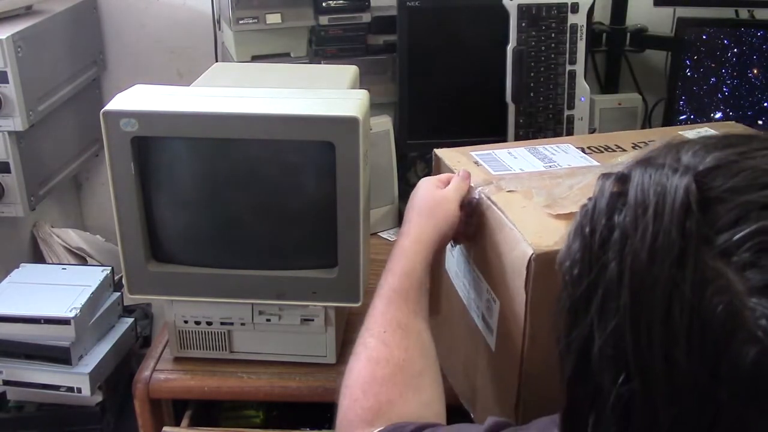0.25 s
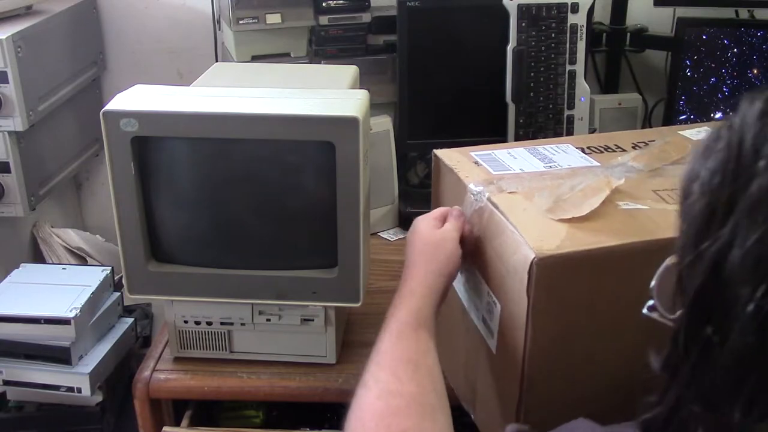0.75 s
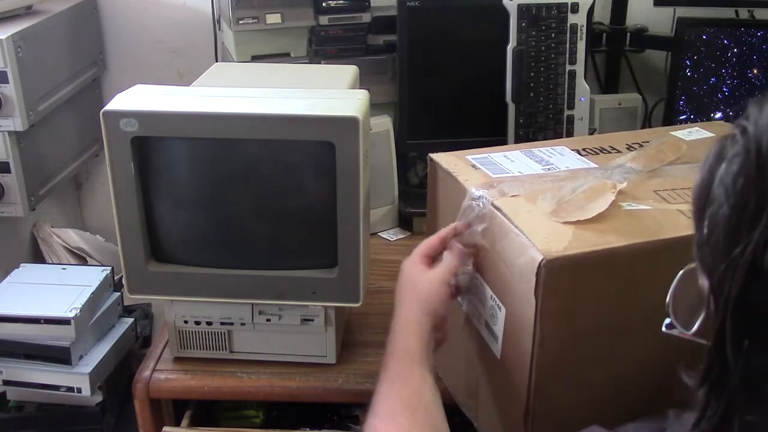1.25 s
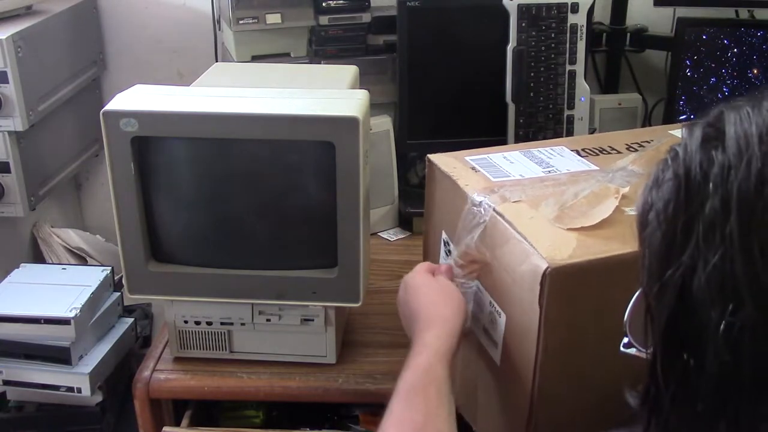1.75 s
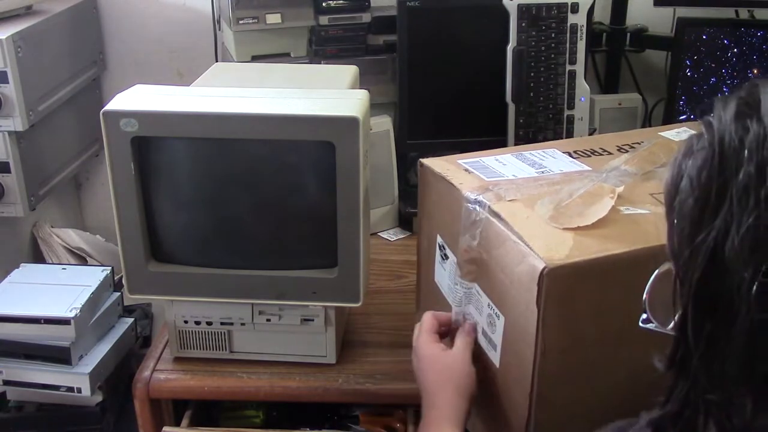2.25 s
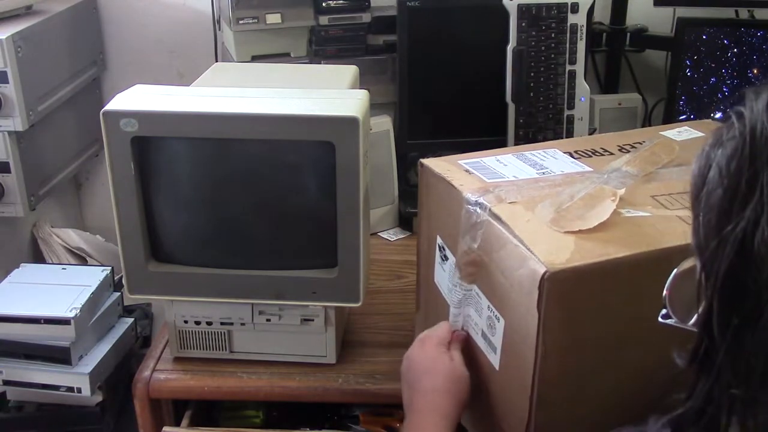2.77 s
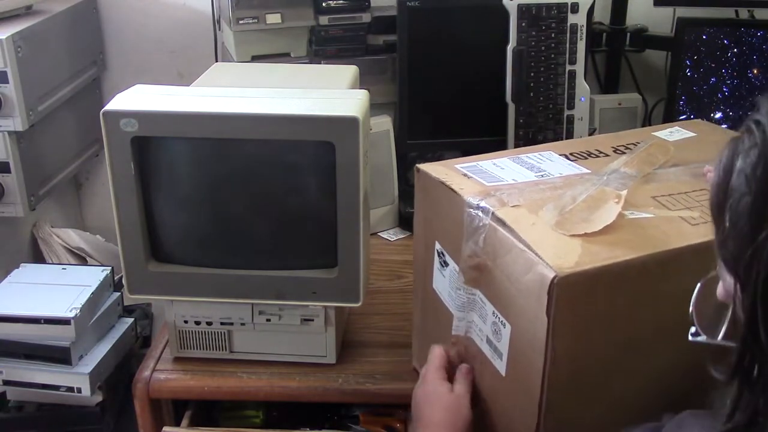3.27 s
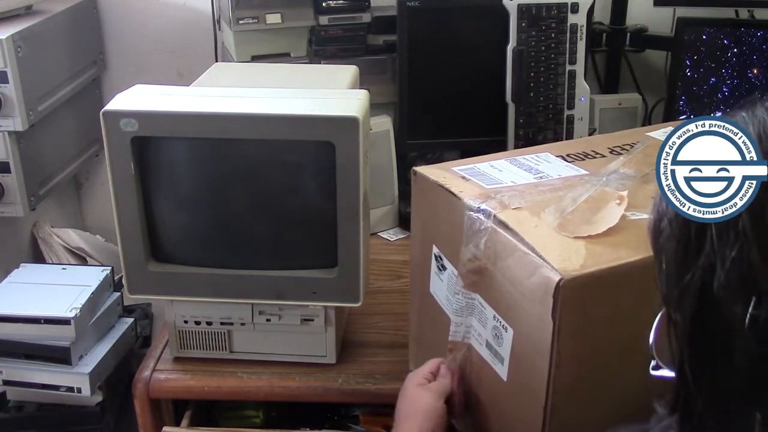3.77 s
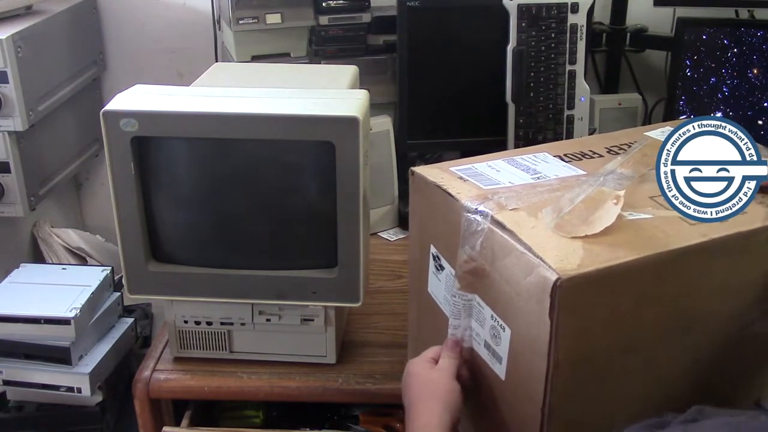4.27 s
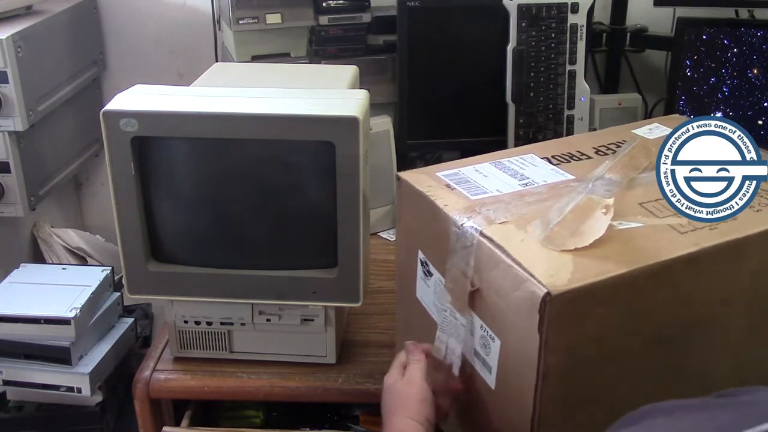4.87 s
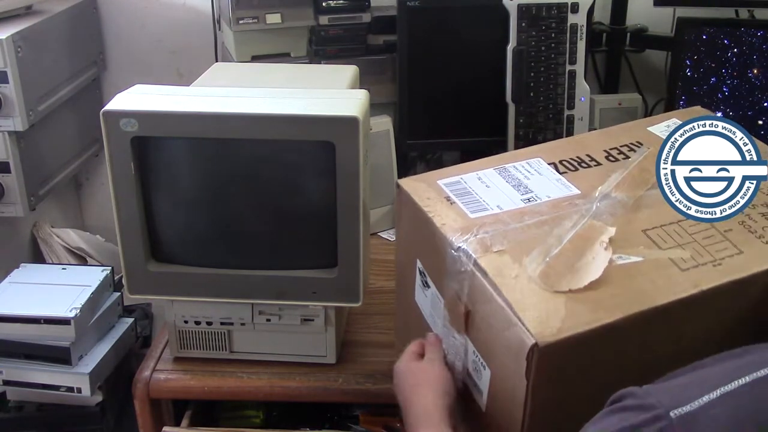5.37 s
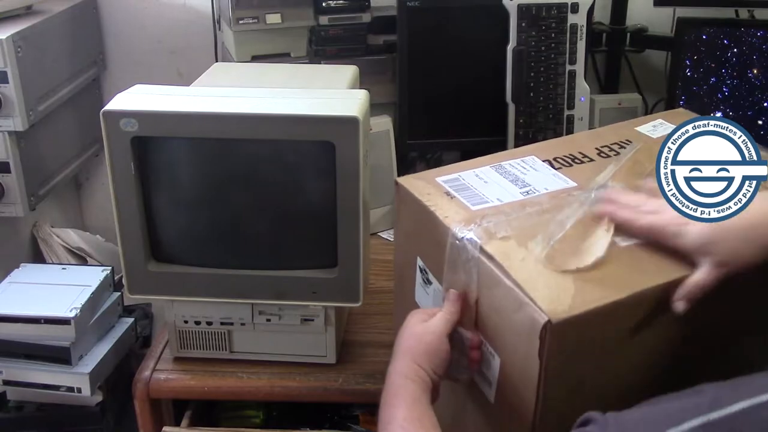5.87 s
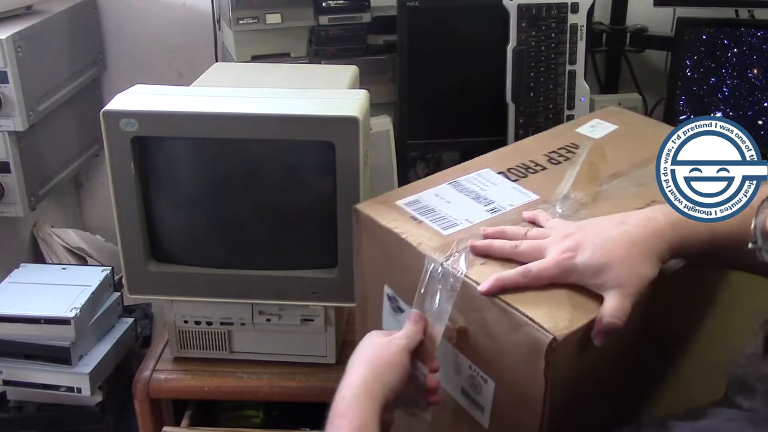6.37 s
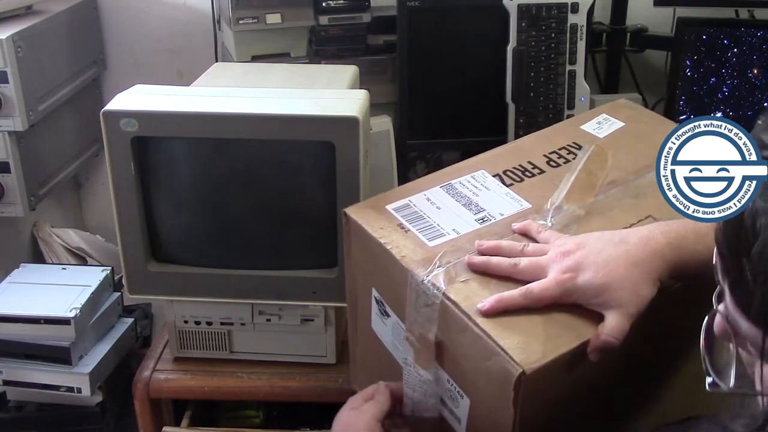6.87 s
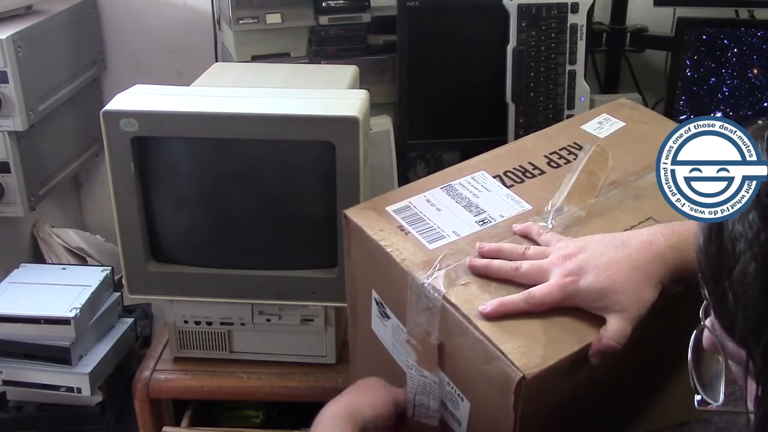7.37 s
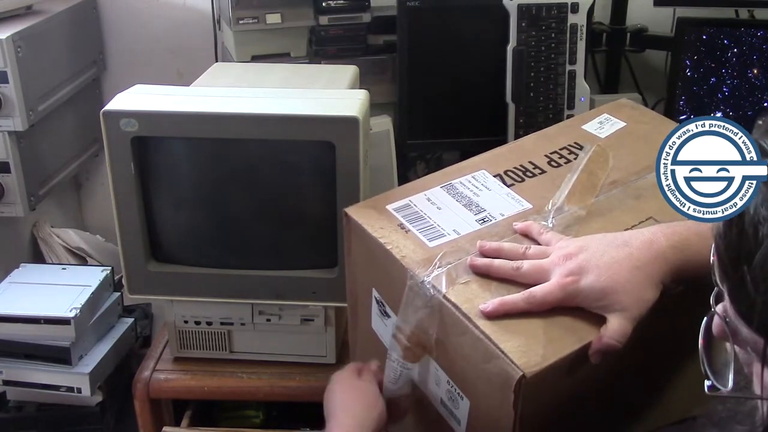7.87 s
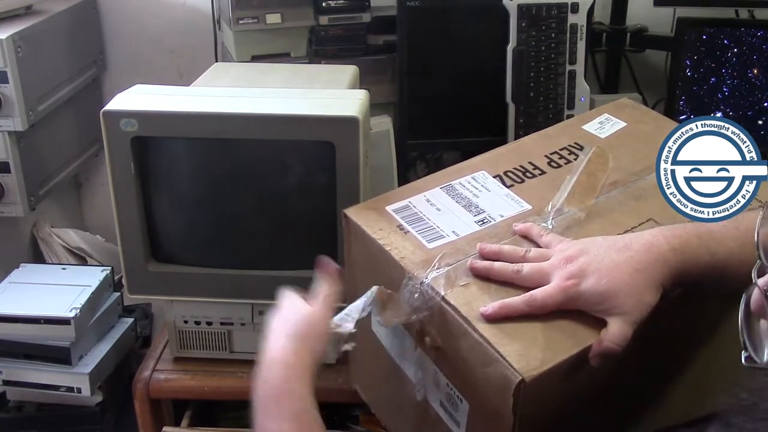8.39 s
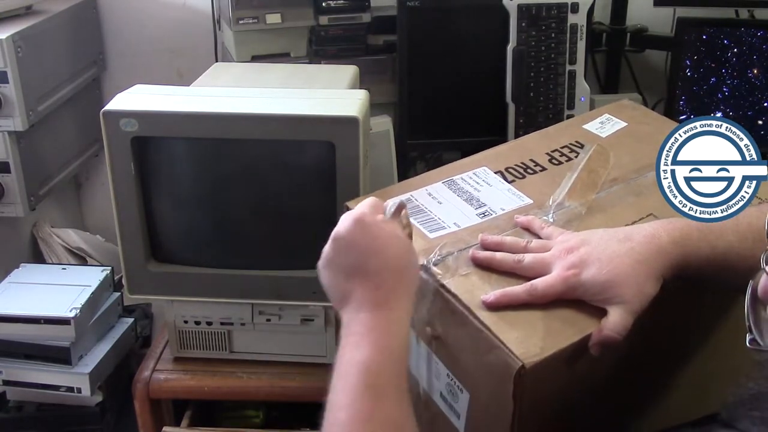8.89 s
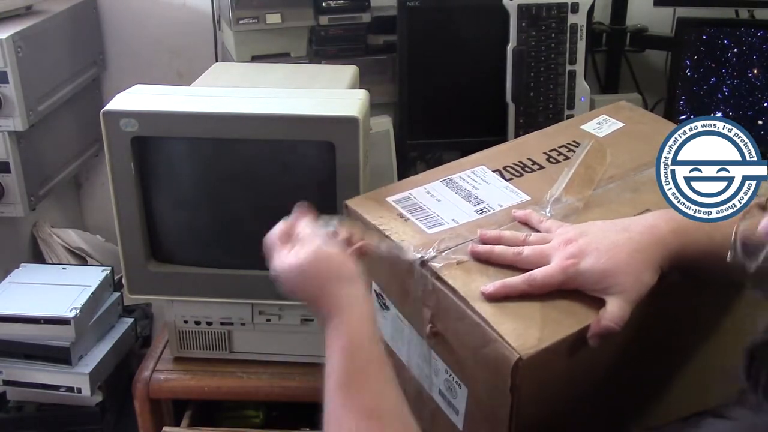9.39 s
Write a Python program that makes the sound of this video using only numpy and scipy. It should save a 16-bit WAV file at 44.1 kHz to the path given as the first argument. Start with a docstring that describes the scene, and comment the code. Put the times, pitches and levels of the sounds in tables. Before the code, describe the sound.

A small, cluttered room, with the microphone about a metre from a cardboard box and a very faint fan hissing and humming with a slight beat. From 0 to 1 second packing tape tears in loud, dense, irregular crackles and hard snaps, the box giving a papery, hollow body and the film a bright edge, with brief squeaks. It drops to light crinkling, then snaps again at about 1.7 to 2.0, 2.85, 3.5 to 3.9 and 4.1 to 4.5 seconds. From 4.6 to 7.7 only faint ticks and rustles remain, with a soft hollow knuckle knock near 5.6 and a small snap near 6.2. Another soft knock at 7.8 leads into renewed peeling until 8.2; sharp, bright rips follow at 8.7 to 8.9, then smaller snaps at 9.2 and 9.4 fade into light crinkles. Room reflections are short.

```python
"""Packing tape is picked at and torn off a cardboard box in a small cluttered room, about a metre from a camera.
A fan hisses and hums throughout: shaped noise, two close beating tones and a fainter high one, swelling together.
From the start the film crackles in spells of stick-slip noise, and glue snaps (noise bursts) ring box, panel and film.
Creased film squeaks on narrow resonances from 0.2 s; snaps crowd the first second and thin out after 4.5 s.
A knuckle knocks the hollow side at 5.6 and 7.8 s, and snaps gather again from 7.8 s; loud peaks are rounded off."""
import sys
import numpy as np
from scipy import signal
from scipy.fft import rfft, irfft
from scipy.io import wavfile
from scipy.ndimage import uniform_filter1d

SR = 44100
rng = np.random.default_rng(int(sys.argv[2]) if len(sys.argv) > 2 else 0)


def digitize_waveform(pressure):
    """Quantize a signal to 16-bit integers and store it at the path in sys.argv[1].

    Rows of a 2-D input are taken as channels; values are limited to [-1, 1].
    """
    field = np.atleast_2d(pressure).T
    bounded = np.clip(field, -1, 1)
    quanta = np.round(bounded * 32767).astype(np.int16)
    wavfile.write(sys.argv[1], SR, quanta)


def amplitude_ratio(level_db):
    """Convert a level in decibels to the matching linear amplitude (field) ratio."""
    exponent = np.asarray(level_db, float) / 20
    return 10 ** exponent


N = 425124
T = np.arange(N) / SR


def unit(x):
    """Scale to rms 1."""
    return x / np.sqrt(np.mean(x ** 2))


def colour(x, points):
    """Shape a noise spectrum by (frequency [Hz], level [dB]) points, joined on a log-frequency axis."""
    hz, db = np.transpose(points)
    f_hz = np.arange(N // 2 + 1) * SR / N + 1
    gain_db = np.interp(np.log(f_hz), np.log(hz), db)
    return irfft(rfft(x) * amplitude_ratio(gain_db), N)


# Background swell: (time [s], level [dB])
FAN_SWELL = [(0, -93), (1.1, -80), (2.2, -79.5), (3.3, -82), (4.0, -83.5), (4.7, -93.5), (5.801, -87.5),
             (6.5, -85.5), (6.9, -83.5), (7.501, -84.5), (8.3, -78.5), (8.7, -76), (9.1, -81),
             (9.64, -78.5)]
# Air hiss spectrum: (frequency [Hz], relative density [dB per Hz])
FAN_HISS = [(35, -68), (60, -37), (124, -24), (256, -12.5), (354, -2.5), (437, -12), (579, -5), (732, -9.5),
            (1040, -7), (2520, -13), (5330, -19), (8320, -16.5), (16000, -48)]
# Hum tones: (frequency [Hz], amplitude relative to swell [dB])
FAN_HUM = [(349.5, -4), (360.7, 7.5), (1039, -11)]


def fan():
    """Air hiss plus hum, two close tones beating and one higher, all under one swell."""
    hiss_db = 12.5
    s, db = np.transpose(FAN_SWELL)
    hum = sum(amplitude_ratio(tone_db) * np.sin(2 * np.pi * (hz * T + rng.random())) for hz, tone_db in FAN_HUM)
    hiss = amplitude_ratio(hiss_db) * unit(colour(rng.standard_normal(N), FAN_HISS))
    return amplitude_ratio(np.interp(T, s, db)) * (hum + hiss)


def walk(rate_hz):
    """Random levels held 1 / rate_hz and slewed; spread near 1."""
    hold = int(SR / rate_hz)
    levels = np.repeat(rng.standard_normal(N // hold + 1), hold)
    return 1.2 * uniform_filter1d(levels, hold)[:N]


def ring(x, modes, low_hz, wander_db, favour_db=None):
    """Two-pole resonances, dark below low_hz; the shape keeps changing, so each is driven more, then less."""
    out, click = 0, 0
    for k, (hz, width_hz, db) in enumerate(modes):
        mode = signal.iirpeak(hz, hz / width_hz, SR)
        sign = (-1) ** k
        drive_db = db + wander_db * walk(25.)
        if favour_db:
            drive_db = drive_db + favour_db(hz)
        out = out + sign * signal.lfilter(*mode, x * amplitude_ratio(drive_db))
        click = click + sign * amplitude_ratio(db) * signal.lfilter(*mode, np.eye(1, 2048)[0])
    steep = signal.butter(5, low_hz, "highpass", fs=SR, output="sos")
    return signal.sosfilt(steep, out) / np.sqrt(np.sum(click ** 2))  # unit click energy before the highpass


# Loose strip, higher when short and tight, shaking the box less when lifted clear:
# (time [s], favoured pitch [Hz], box drive relative to panel [dB])
LOOSE_STRIP = [(0, 1441, -2), (.35, 1461, -9), (.5, 1780, -4), (1.0, 2178, -1), (1.2, 3800, -3),
               (1.6, 3586, -6), (1.75, 2000, -0.5), (2.1, 2127, 0.5), (2.4, 3796, 1.5), (2.85, 2590, 3),
               (3.4, 3640, -4.5), (3.55, 2338, -3), (4.0, 2435, -4), (4.12, 2740, -25), (4.35, 2440, -13),
               (4.42, 2000, -0.5), (4.6, 2400, -3.5), (5.7, 2780, -7.5), (6.4, 2340, -4), (6.7, 3720, -1.5),
               (7.8, 2790, -2.5), (7.95, 2500, -22), (8.15, 2304, -3), (8.65, 2403, -18), (8.8, 2336, -8.5),
               (9.4, 2190, -14), (9.5, 4040, -13)]


def thump_db(s, panel_db, film_db):
    """How hard the box is shaken: less with a lifted strip or a thin, bright tick."""
    loss_per_db = 0.05  # dB lost per dB of film over panel
    at, _, grip_db = np.transpose(LOOSE_STRIP)
    return panel_db + np.interp(s, at, grip_db) - loss_per_db * np.maximum(film_db - panel_db, 0)


# Cardboard box modes: (frequency [Hz], width [Hz], relative drive [dB])
BOX_MODES = [(194, 40, -18), (326, 88, -10.5), (483, 80, -9.5), (588, 54, -1.5), (862, 290, -2),
             (975, 230, 2), (1378, 650, -1.5)]
# Panel modes: (frequency [Hz], width [Hz], relative drive [dB])
PANEL_MODES = [(1670, 160, -7), (2000, 380, -3), (2540, 500, -1), (3380, 980, 1.5), (4900, 2700, -1)]
# Film modes: (frequency [Hz], width [Hz], relative drive [dB])
FILM_MODES = [(6200, 1377, -4), (8630, 1580, -2.5), (10230, 2030, -5), (12140, 2400, -9),
              (14300, 1700, -22)]


def bodies(box, panel, film):
    """Box, panel and film ring; the strip favours panel modes near its pitch and, lifted, starves low box modes."""
    bass_loss_per_octave = 0.22  # extra share of the lift loss per octave below the top box mode
    at, pitch_hz, grip_db = np.transpose(LOOSE_STRIP)
    strip_hz = np.interp(T, at, pitch_hz)
    lifted_db = np.minimum(np.interp(T, at, grip_db), 0)

    def favour_db(hz):
        return 3.5 - 6.0 * np.abs(np.log2(hz / strip_hz))

    def bass_db(hz):
        return bass_loss_per_octave * lifted_db * np.log2(BOX_MODES[-1][0] / hz)

    thump = ring(box, BOX_MODES, low_hz=183.0, wander_db=3.0, favour_db=bass_db)
    rattle = ring(panel, PANEL_MODES, low_hz=1340.0, wander_db=1.06, favour_db=favour_db)
    tick = ring(film, FILM_MODES, low_hz=5680.0, wander_db=2.0)
    return thump + rattle + tick


def creases(rate_hz, spread_db, last_s):
    """Randomly timed slips of uneven size, each decaying over last_s; rms 1."""
    chance = rng.random((N, 2))
    size = amplitude_ratio(-spread_db * np.log(1 - .98 * chance[:, 1]))  # bounded exponential spread in dB
    slips = (chance[:, 0] < rate_hz / SR) * size
    return unit(signal.lfilter([1], [1, -np.exp(-1 / (last_s * SR))], slips))


def spells(starts, lengths, db):
    """A gain that holds through each spell, with 10 ms edges and a weak exponential linger."""
    linger_s, linger_db = 0.024, -18.0
    steps = np.zeros(N + 1)
    np.add.at(steps, np.clip(starts * SR, 0, N).astype(int), amplitude_ratio(db))
    np.add.at(steps, np.clip((starts + lengths) * SR, 0, N).astype(int), -amplitude_ratio(db))
    held = np.abs(uniform_filter1d(np.cumsum(steps)[:N], int(.01 * SR)))
    pole = np.exp(-1 / (linger_s * SR))
    return held + amplitude_ratio(linger_db) * signal.lfilter([1 - pole], [1, -pole], held)


# Spells of peeling and creasing: (time [s], length [s], panel drive [dB], film drive [dB])
PEEL_SPELLS = [(0, .045, -45.5, -45.5), (0.063, .045, -34.5, -37), (0.18, .075, -39, -44),
               (0.273, 0.15, -25.5, -29), (0.451, .045, -27, -41), (0.509, .135, -44, -45.5),
               (0.655, .035, -27, -32.5), (0.699, 0.15, -42, -36), (.798, .19, -28.5, -28.5),
               (1.069, 0.055, -68, -50), (1.164, .2, -65.5, -47.5), (1.363, .04, -56.5, -41.5),
               (1.43, .09, -53.5, -43), (1.601, 0.074, -56.5, -50), (1.673, .18, -40, -36),
               (1.95, 0.097, -47.5, -44.5), (2.203, .07, -71.5, -67.5), (2.338, .175, -67.5, -67),
               (2.553, .08, -73, -59.5), (2.766, 0.081, -62.5, -46.5), (2.839, 0.11, -45.5, -39),
               (3.181, .22, -71, -61.5), (3.256, 0.068, -65, -53), (3.689, .08, -38.5, -41),
               (4.139, .06, -50.5, -52), (4.317, .06, -43, -51), (4.399, .023, -51, -55),
               (4.631, 0.054, -78, -65), (4.77, 0.065, -84.5, -75.5), (4.912, .125, -75, -63.5),
               (4.943, 0.025, -61.5, -43.5), (5.046, .2, -73, -66), (5.38, 0.07, -72.5, -70.5),
               (5.549, 0.025, -61, -54.5), (5.529, 0.142, -70.5, -61), (5.685, 0.071, -62.5, -66),
               (5.793, .26, -75.5, -67), (6.13, .037, -58.5, -49.5), (6.252, .13, -59.5, -51),
               (6.387, 0.03, -49, -41), (6.577, .26, -75.5, -64.5), (6.669, .06, -73, -51),
               (6.938, 0.058, -79, -62), (7.215, .165, -78.5, -76.5), (7.535, 0.033, -77.5, -66),
               (7.767, .085, -53, -44.5), (7.95, .095, -39, -36.5), (8.054, 0.15, -32.5, -31.5),
               (8.602, .086, -45.5, -41), (8.713, .03, -51, -49), (8.768, .05, -26, -29.5),
               (8.84, .1, -37, -36.5), (9.054, 0.19, -64, -50.5), (9.15, 0.036, -46.5, -39),
               (9.276, .13, -67.5, -49.5), (9.418, .14, -60.5, -47.5), (9.587, 0.05, -70, -54.5)]


def crackle():
    """Stick-slip creases and lesser snaps over fine peel hiss, in spells; sparse faint film ticks throughout."""
    small_snap_share, ticks_db = 0.31, -78
    s, length_s, panel_db, film_db = np.transpose(PEEL_SPELLS)
    grain = creases(rate_hz=600., spread_db=4.6, last_s=.0006) + .35  # constant part: peel hiss
    grain = grain + small_snap_share * creases(rate_hz=70, spread_db=5.0, last_s=0.0036)
    box_db = thump_db(s + length_s / 2, panel_db, film_db)

    def drive(db):
        return unit(grain * rng.standard_normal(N)) * spells(s, length_s, db)

    ticks = amplitude_ratio(ticks_db) * creases(rate_hz=56.0, spread_db=3.0, last_s=.0006) * rng.standard_normal(N)
    return bodies(drive(box_db), drive(panel_db) + amplitude_ratio(-7) * ticks, drive(film_db) + ticks)


def bursts(starts, fade_s, gain, drag_db):
    """From each start a sharp burst of tiny slips, then a weaker drag eight times as long."""
    t = np.arange(1024) / SR
    slips = rng.laplace(size=(len(starts), len(t)))
    slips[:, :3] += np.sign(slips[:, :3])  # the first break is always firm
    fade = np.exp(-t / fade_s[:, None])
    drag = amplitude_ratio(drag_db) * np.exp(-t / (8.0 * fade_s[:, None]))
    at = (starts * SR).astype(int)[:, None] + np.arange(len(t))
    pulses = slips * (fade + drag) * gain[:, None]
    return np.bincount(at.ravel(), pulses.ravel(), N + len(t))[:N]


# Glue letting go, the clearest snaps: (time [s], panel drive [dB], film drive [dB])
GLUE_SNAPS = [(0.0525, -15.5, -12), (0.1097, -9, -10.5), (0.224, -32.5, -23.5), (0.3298, -11.5, -14),
              (.356, -18, -19.5), (0.3797, -14, -12.5), (0.3964, -15, -12.5), (0.407, -18.5, -17.5),
              (.439, -7, -14.5), (0.5385, -28.5, -29.5), (0.6492, -13.5, -9.5), (0.7456, -36.5, -21.5),
              (0.8047, -16.5, -17.5), (.8352, -22, -8), (0.8516, -17, -24), (.889, -14, -9.5),
              (0.932, -12.5, -15), (0.9401, -24, -14), (0.9599, -15.5, -17.5), (.9822, -16, -10.5),
              (1.181, -50.5, -29), (1.2624, -52, -33.5), (1.296, -47, -26.5), (1.327, -37, -28),
              (1.371, -50.5, -29), (1.4425, -31, -14.5), (1.4965, -35.5, -30.5), (1.51, -40, -31.5),
              (1.6982, -29, -21), (1.7354, -19, -17), (1.7602, -17, -15), (1.8096, -16, -21),
              (1.8355, -18.5, -19.5), (1.9811, -24, -29), (2.0339, -25.5, -25), (2.1134, -48, -31),
              (2.6014, -53, -26), (2.7643, -60, -35), (2.8358, -16.5, -21), (2.7831, -46, -29),
              (2.854, -18.5, -11), (2.959, -56, -31), (2.9265, -25.5, -27), (3.5283, -19, -12.5),
              (3.5681, -22.5, -23.5), (3.6973, -17.5, -14), (3.7108, -17.5, -19.5), (3.7296, -14, -13.5),
              (3.743, -21.5, -20), (3.806, -31.5, -22.5), (3.8511, -15.5, -17), (3.9842, -41, -41),
              (4.1325, -36, -43), (4.1464, -28.5, -39.5), (4.157, -23, -28.5), (4.1922, -30.5, -34),
              (4.3122, -25.5, -26), (4.321, -29.5, -30.5), (4.3435, -25.5, -26), (4.3621, -26.5, -31),
              (4.4229, -15.5, -17), (4.5331, -14, -11.5), (5.08, -51, -35.5), (5.1564, -49.5, -38),
              (5.6034, -53, -40.5), (6.158, -23.5, -16.5), (6.2158, -51, -28.5), (6.606, -67.5, -38),
              (6.7906, -70, -38.5), (6.9672, -76, -43.5), (7.3074, -70, -43), (7.5583, -41, -27),
              (7.801, -27.5, -19), (7.851, -39.5, -22), (7.9571, -30, -24.5), (7.9785, -23, -23.5),
              (8.0619, -23, -17.5), (8.1031, -19.5, -17.5), (8.1652, -24.5, -21.5), (8.66, -26, -23),
              (8.77, -35.5, -22), (8.795, -19.5, -10.5), (8.872, -22, -10.5), (8.8835, -15.5, -6.5),
              (9.1007, -56, -28.5), (9.1732, -25.5, -27), (9.4071, -24, -14.5), (9.5043, -42.5, -32.5),
              (9.573, -50, -27)]


def snaps():
    """Each snap tears a strip of glue in a few ms; box, panel and film ring with it."""
    s, panel_db, film_db = np.transpose(GLUE_SNAPS)
    base_fade_s = 0.00067 * amplitude_ratio(0.063 * (panel_db + 26.5))  # a stronger snap frees more glue, lasts longer
    box = bursts(s, 0.93 * base_fade_s, amplitude_ratio(thump_db(s, panel_db, film_db)), drag_db=-11.5)
    panel = bursts(s, 1.063 * base_fade_s, amplitude_ratio(panel_db), drag_db=-10)
    film = bursts(s, 0.71 * base_fade_s, amplitude_ratio(film_db), drag_db=-11.5)
    return bodies(box, panel, film)


# Squeaks of a creased patch of film: (time [s], length [s], pitch [Hz], level [dB])
FILM_SQUEAKS = [(0.186, 0.045, 1370, -42.5), (0.329, 0.089, 1425, -32), (0.852, 0.023, 2410, -28),
                (1.303, 0.078, 3700, -54.5), (2.333, 0.091, 5990, -65.5), (2.42, 0.053, 1198, -63.5),
                (2.468, 0.019, 3740, -59.5), (2.767, 0.043, 3820, -53.5), (3.192, .02, 6060, -57.5),
                (3.262, 0.028, 3760, -55.5), (6.682, 0.035, 3920, -59.5), (9.501, 0.0125, 4040, -50.5)]


def squeaks():
    """Uneven slips ring one narrow resonance of the patch."""
    grain = creases(rate_hz=250, spread_db=3.0, last_s=.0012) + .3
    slips = unit(grain * rng.standard_normal(N))
    out = np.zeros(N)
    for s, length_s, hz, db in FILM_SQUEAKS:
        a, n = int(s * SR), int(length_s * SR)
        push = np.zeros(2 * n)  # second half: ring-out
        push[:n] = slips[a:a + n] * signal.windows.tukey(n, .5)
        peak = signal.iirpeak(hz, 5.1, SR)  # Q of each of two passes
        tone = signal.lfilter(*peak, signal.lfilter(*peak, push))
        out[a:a + 2 * n] += amplitude_ratio(db) * np.sqrt(2) * unit(tone)
    return out


# Knuckle meeting the hollow side: (time [s], drive [dB])
KNUCKLE_KNOCKS = [(5.551, -40), (7.801, -41)]
# Air-filled side modes: (frequency [Hz], width [Hz], relative drive [dB])
HOLLOW_MODES = [(152, 40, -10), (294, 72, -1), (643, 140, 1), (910, 220, -2)]


def knocks():
    """Soft, slow pushes on the hollow side."""
    s, db = np.transpose(KNUCKLE_KNOCKS)
    push = bursts(s, np.full(len(s), .004), amplitude_ratio(db), drag_db=-14)
    return ring(push, HOLLOW_MODES, low_hz=110., wander_db=0)


# Reverberation, bass band to treble band: (t60 of the faster decay [s], level [dB])
ROOM_BANDS = [(0.18, -10), (0.15, -7.5), (.16, -7), (.12, -10)]


def room(x):
    """Shelves and walls send back a dense short tail, each band fading at its own rate in two slopes."""
    t = np.arange(int(.3 * SR)) / SR
    edges_hz = [(100, 700), (700, 2400), (2400, 5500), (5500, 18000)]
    tail = 0
    for (t60_s, db), edge_hz in zip(ROOM_BANDS, edges_hz):
        bandpass = signal.butter(2, edge_hz, "bandpass", fs=SR, output="sos")
        band = signal.sosfilt(bandpass, rng.standard_normal(len(t)))
        fade = amplitude_ratio(-60 * t / t60_s) + amplitude_ratio(-15.0 - 30 * t / t60_s)
        fade = fade * np.clip(t / 0.0021, 0, 1)  # 2.1 ms build-up
        tail = tail + amplitude_ratio(db) * band * fade / np.sqrt(np.sum(fade ** 2))
    return x + signal.fftconvolve(x, tail)[:N]


def scene():
    """Tape and box in the room, over the fan."""
    tape_and_box = crackle() + snaps() + squeaks() + knocks()
    return (fan() + room(tape_and_box))[None]


def top_cut(x):
    """Nothing passes above the cut-off."""
    return signal.sosfilt(signal.butter(12, 16970, fs=SR, output="sos"), x)


def record(dry):
    """The microphone loses bass and dips in the lower treble; peaks are squashed, a little unevenly."""
    x = signal.sosfilt(signal.butter(2, 170., "highpass", fs=SR, output="sos"), dry)
    x = x - 0.41 * signal.lfilter(*signal.iirpeak(5400., 5.5, SR), x)
    top = .52  # tanh ceiling, full scale = 1
    x = top * np.tanh(x / top)
    mix = x + 0.0068 * x ** 2  # polarity asymmetry
    return top_cut(mix)


dry = scene()
out = record(dry)
digitize_waveform(out)
```